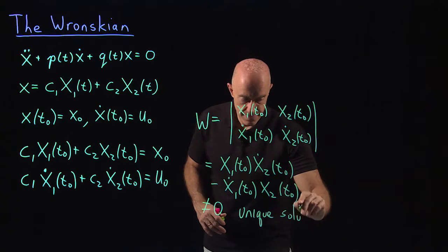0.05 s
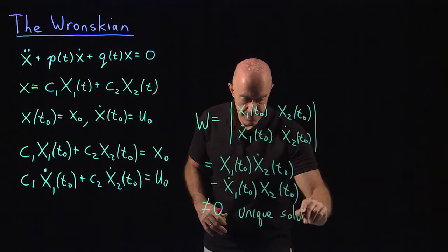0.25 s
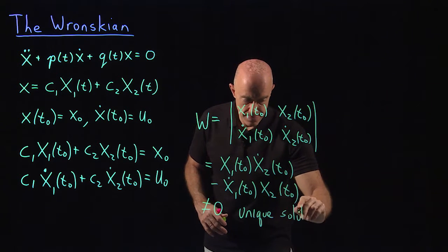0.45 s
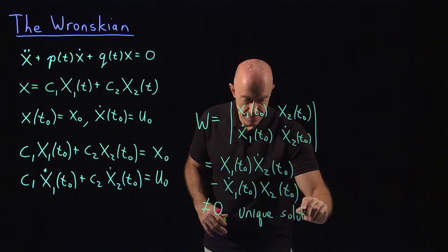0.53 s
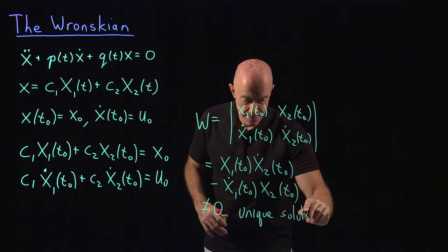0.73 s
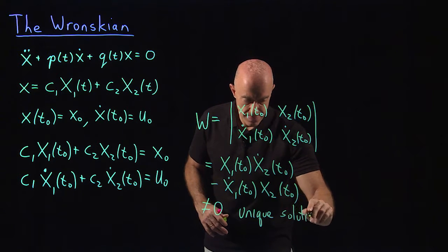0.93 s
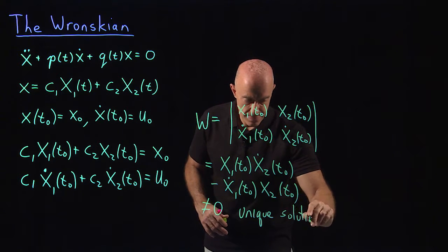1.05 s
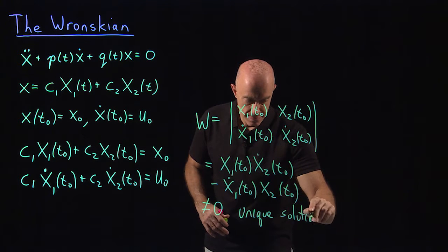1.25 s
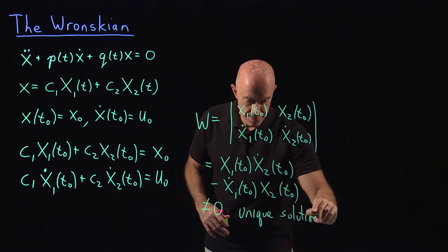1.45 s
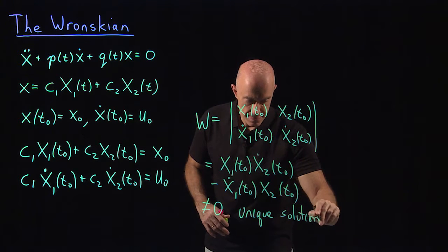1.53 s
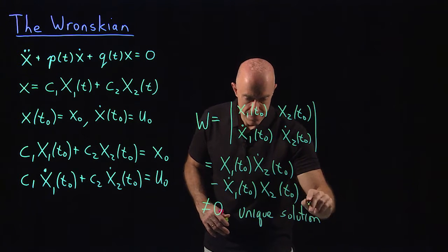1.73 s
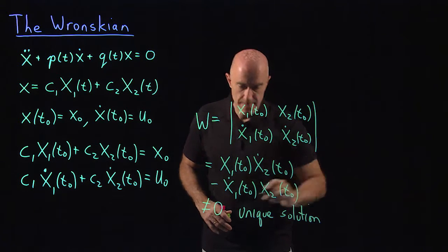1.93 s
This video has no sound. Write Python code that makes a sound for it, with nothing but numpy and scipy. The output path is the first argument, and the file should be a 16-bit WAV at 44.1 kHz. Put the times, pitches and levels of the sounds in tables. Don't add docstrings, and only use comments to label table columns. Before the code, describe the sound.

Marker on glass, heard indoors over constant microphone hiss and faint hum: the nib lands, squeaks very high for an instant, then makes sparse light strokes and pane knocks, ending with a dull tap.

```python
import sys
import numpy as np
from scipy import signal
from scipy.fft import rfft, irfft
from scipy.io import wavfile
from scipy.ndimage import uniform_filter1d

SR = 44100
rng = np.random.default_rng(int(sys.argv[2]) if len(sys.argv) > 2 else 0)


def transcribe(u):
    v = np.clip(np.atleast_2d(u).T, -1, 1)
    q = np.round(v * 32767).astype(np.int16)
    wavfile.write(sys.argv[1], SR, q)


def linear_from_db(decibels):
    return 10 ** (np.asarray(decibels, float) / 20)


N = 88200


def evened(x):
    return x / np.sqrt(np.mean(x ** 2) + 1e-20)


def read(points, hz):
    f, value = np.transpose(points)
    return np.interp(np.log(hz + 1), np.log(f + 1), value)


def add(mix, s, sound):
    part = mix[round(s * SR):][:len(sound)]
    part += sound[:len(part)]


def resonate(x, hz, width):
    r = np.exp(-np.pi * width / SR)
    pole = r * np.exp(2j * np.pi * hz / SR)
    return 2 * signal.lfilter([1 - r], [1, -pole], x).real


def resonate_twice(x, hz, width):
    return resonate(resonate(x, hz, width), hz, width)


def wander(size, top_hz):
    k = max(int(SR / top_hz / 2), 2)
    smooth = uniform_filter1d(rng.standard_normal(size), k)
    return evened(uniform_filter1d(smooth, k))


def swell(length, rise):
    u = np.arange(0, length, 1 / SR) / length
    rise = np.clip(rise, .05, .95)
    return np.sin(np.pi / 2 * np.minimum(u / rise, (1 - u) / (1 - rise)))


# f/Hz, level/dB (per Hz)
HISS_COLOUR = [(12, -58.5), (20, -8.5), (214, -3.5), (274, -6), (492, -7), (688, -8), (1200, -9.5),
               (1630, -9), (15600, -9.5)]


def hiss():
    shape = linear_from_db(read(HISS_COLOUR, np.fft.rfftfreq(N, 1 / SR)))
    noise = irfft(rfft(rng.standard_normal(N)) * shape, N)
    hum = resonate_twice(rng.standard_normal(N), 102.4, 12.6)
    return linear_from_db(-63.5) * evened(noise) + linear_from_db(-82) * evened(hum)


# t/s (centre), f/Hz (centre)
STRAY_PATCHES = [(.005, 6900), (.09, 5200), (.09, 15000), (.16, 15000), (.207, 4800), (.207, 8300),
                 (.439, 9700), (.532, 12400), (.834, 10400), (.88, 5200), (.88, 6400), (.88, 8300),
                 (.88, 12400), (.996, 13800), (1.159, 8300), (1.159, 13000), (1.159, 14500), (1.298, 4800),
                 (1.298, 6300), (1.6, 4800), (1.6, 9000), (1.6, 14500), (1.948, 7600), (1.948, 12400),
                 (1.99, 4800), (1.99, 12800)]


def strays():
    level_db, half_width_hz, patch_s = -77, 630, 0.023
    out = np.zeros(N)
    hz, t = np.fft.rfftfreq(2048, 1 / SR), np.arange(-1024, 1024) / SR
    fade = np.exp(-(2 * t / patch_s) ** 4)
    for s, centre_hz in STRAY_PATCHES:
        band = abs(hz - centre_hz) < half_width_hz
        patch = evened(irfft(rfft(rng.standard_normal(2048)) * band))
        add(out, max(s + t[0], 0), linear_from_db(level_db) * patch * fade)
    return out


# f/Hz, t60/s
ROOM_DECAY = [(200, 0.285), (500, 0.644), (1500, 0.27), (3200, 0.3), (9600, 0.231)]


def room(x):
    tail_start_s, spacing = 0.0089, 20
    taps = np.zeros(SR // 2)
    at = np.arange(round(tail_start_s * SR), SR // 2 - spacing, spacing)
    at = at + rng.integers(0, spacing, len(at))
    taps[at] = rng.choice([-1., 1.], len(at))
    hz, t, z = signal.stft(taps, SR, nperseg=256)
    z = z * linear_from_db(-60 * t / read(ROOM_DECAY, hz)[:, None])
    z = z / np.linalg.norm(z, axis=1, keepdims=True)
    tail = signal.istft(z, SR, nperseg=256)[1]
    return signal.fftconvolve(x, tail / np.linalg.norm(tail))[:N]


# t/s, level/dB (peak), f/Hz (of the push)
LANDINGS = [
    (0.191, -63, 195.5),
    (.528, -50, 260),
    (0.7606, -60, 211),
    (1.02, -64, 128),
    (1.8072, -40, 320),
    (1.944, -64, 119),
]
# f/Hz, level/dB, t60/s
PANE_MODES = [(212, -11, 0.0777), (250.2, -26, 0.41), (352, -22.5, 0.47), (380.5, -16.5, 0.097),
              (475, -22.5, 0.233), (882, -27, 0.073), (1129, -22, 0.07), (1550, -22, 0.049)]
# t/s (delay), level/dB
REFLECTIONS = [(.0055, -9), (.0073, -11), (.0105, -33), (.0335, -13.5), (0.0452, -19.5)]


def knocks():
    push_cycles, ring_hz, ring_rise_s = 0.4306, 320, 0.0045
    out = np.zeros(N)
    t, u = np.arange(-600, 600) / SR, np.arange(SR // 2) / SR
    ring = sum(linear_from_db(db - 60 * u / t60) * np.cos(2 * np.pi * hz * u) for hz, db, t60 in PANE_MODES)
    ring = ring * np.minimum(u / ring_rise_s, 1)
    for s, db, hz in LANDINGS:
        push = np.exp(-(t * hz / push_cycles) ** 2) * np.cos(2 * np.pi * hz * t)
        start = s - 600 / SR
        add(out, start, linear_from_db(db) * push)
        for delay, wall_db in REFLECTIONS:
            add(out, start + delay, linear_from_db(db + wall_db) * push)
        add(out, s, linear_from_db(db) * (hz / ring_hz) ** 2 * ring)
    return out


# t/s (start), length/s, level/dB, share of length rising
STROKES = [
    (0.236, 0.0178, -57.5, 0.62),
    (0.245, 0.0386, -65.5, .4),
    (0.289, 0.0538, -59, 0.29),
    (.55, 0.073, -68, 0.85),
    (0.803, 0.0396, -67.5, 0.47),
    (.832, 0.029, -66, 0.81),
    (1.07, 0.064, -73, .5),
    (1.362, 0.045, -64.5, 0.4),
    (1.57, 0.0662, -65.5, 0.83),
    (1.83, 0.031, -80.5, 0.54),
]
# f/Hz, width/Hz, level/dB
NIB_MODES = [(3256, 720, -8), (5762, 1350, -8), (7323, 2130, -1), (8854, 2400, 1), (10610, 830, -8),
             (12150, 2600, -14.5)]


def scuffs():
    slips_per_s, spread_db, smooth_share = 12000, 2, 0.263
    size = linear_from_db(spread_db * np.minimum(rng.exponential(1, N), 2.5)) * rng.choice([-1., 1.], N)
    slips = evened(size * (rng.random(N) < slips_per_s / SR))
    drag = slips + smooth_share * rng.standard_normal(N)
    felt = evened(sum(linear_from_db(db) * evened(resonate_twice(drag, hz, width)) for hz, width, db in NIB_MODES))
    pressure = np.zeros(N)
    for s, length, db, rise in STROKES:
        add(pressure, s, linear_from_db(db) * swell(length, rise))
    return felt * pressure


# t/s, level/dB, f/Hz
TIP_CATCHES = [
    (.2445, -45, 8400),
    (.248, -58, 12000),
    (1.6135, -53, 9400),
    (1.619, -55, 9200),
]


def catches():
    out, t = np.zeros(N), np.arange(-200, 200) / SR
    burst = np.exp(-(t / 0.00067) ** 2)
    for s, db, hz in TIP_CATCHES:
        add(out, s - 200 / SR, linear_from_db(db) * burst * np.cos(2 * np.pi * hz * t))
    return out


# t/s (start), length/s, f/Hz, glide/Hz, level/dB
LOW_STICKS = [
    (0.2434, 0.0085, 3265, -44, -56.5),
    (0.327, 0.01756, 3211, -56.5, -51.5),
    (.36, 0.037, 3200, -12.5, -72.5),
    (.855, 0.0416, 1550, -25.5, -78.5),
    (1.387, 0.058, 1580, -110, -69),
    (1.624, 0.039, 1519, -40, -66),
]


def chirps():
    out = np.zeros(N)
    for s, length, hz, glide_hz, db in LOW_STICKS:
        shape = swell(length, 0.316)
        pitch = hz + np.linspace(0, glide_hz, len(shape))
        add(out, s, linear_from_db(db + 3.5) * shape * np.sin(2 * np.pi * np.cumsum(pitch) / SR))
    grip = 1 + 0.077 * wander(N, 300)
    return out * grip


# t/s, f/Hz, level/dB, looseness of grip (0-1)
SQUEAK_PATH = [
    (0.24, 7870, -59.5, .4),
    (0.2462, 8427, -47.5, 0.1),
    (.249, 8989, -31, 0),
    (.262, 9404, -31.5, 0),
    (.28, 9622, -35, 0),
    (0.2905, 9706, -37.5, 0.1),
    (.308, 9773, -36.5, 0.25),
    (.323, 9452, -37, 0),
    (0.33, 9080, -52, 0),
]


def squeak():
    flutter_hz, pitch_flutter_hz = 260, 120
    t = np.arange(N) / SR
    s, hz, db, loose = np.transpose(SQUEAK_PATH)
    loose = np.clip(np.interp(t, s, loose), 0, 1)
    pitch = np.interp(t, s, hz) + pitch_flutter_hz * loose * wander(N, flutter_hz)
    level = linear_from_db(np.interp(t, s, db, -200, -200)) * (1 + loose * wander(N, flutter_hz))
    return np.sqrt(2) * level * np.sin(2 * np.pi * np.cumsum(pitch) / SR)


def scene():
    pen = squeak() + chirps() + catches() + scuffs()
    pane = signal.filtfilt(*signal.butter(1, 64, "high", fs=SR), knocks())
    wet = room(linear_from_db(-18.5) * pen + linear_from_db(-5.5) * pane)
    mono = pen + pane + wet + hiss()
    return mono + np.array([[1], [-1]]) * strays()


def low_pass(x):
    return signal.sosfilt(signal.butter(12, 15730, fs=SR, output="sos"), x)


def record(dry):
    edge = signal.firwin(511, 15800, window=("kaiser", 9), fs=SR)
    limited = signal.oaconvolve(dry, edge[None], "same")
    return low_pass(limited)


dry = scene()
out = record(dry)
transcribe(out)
```